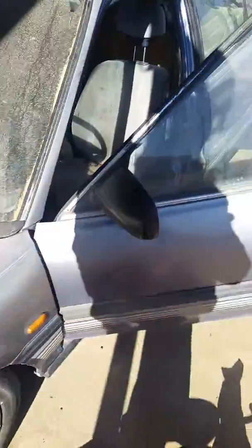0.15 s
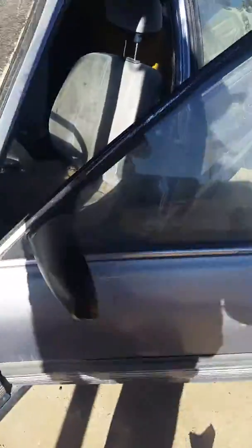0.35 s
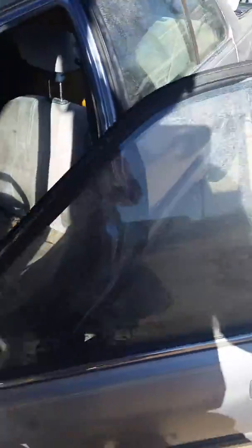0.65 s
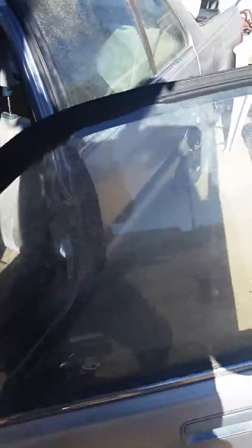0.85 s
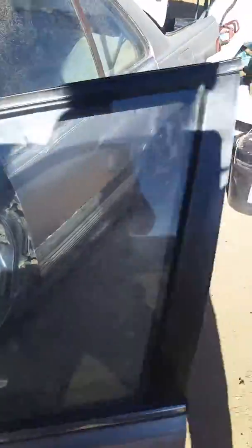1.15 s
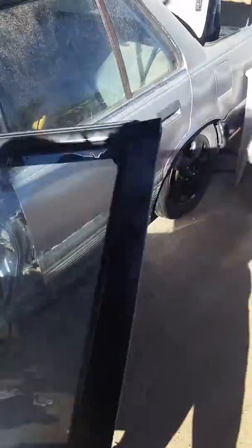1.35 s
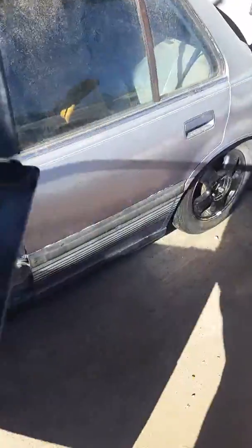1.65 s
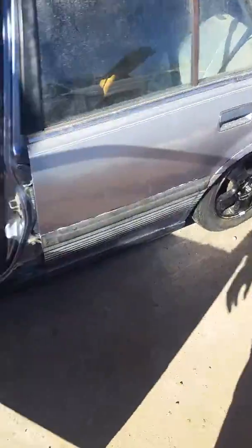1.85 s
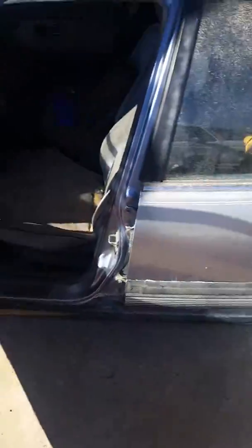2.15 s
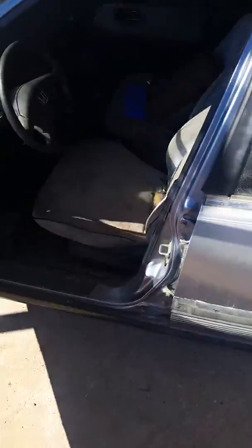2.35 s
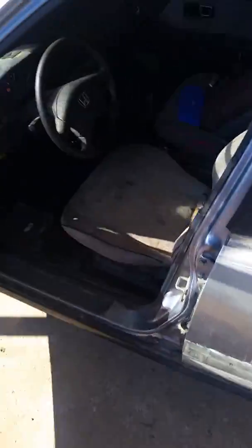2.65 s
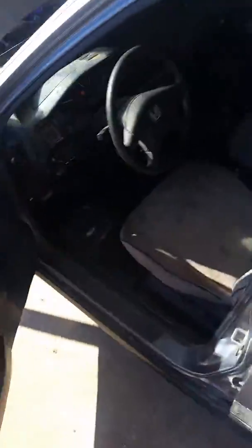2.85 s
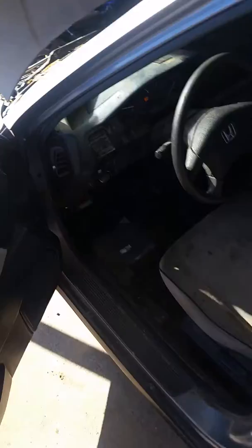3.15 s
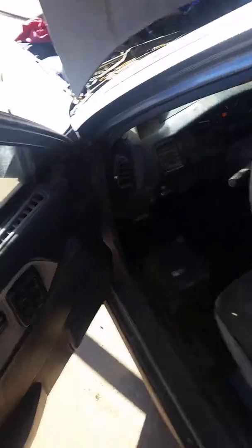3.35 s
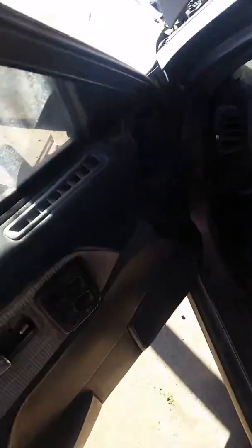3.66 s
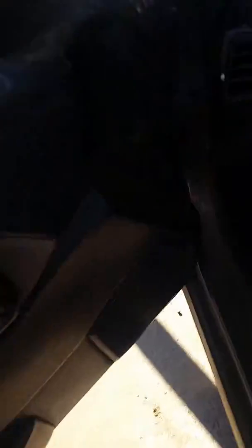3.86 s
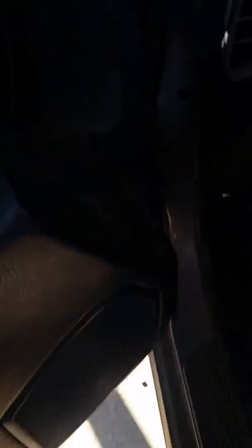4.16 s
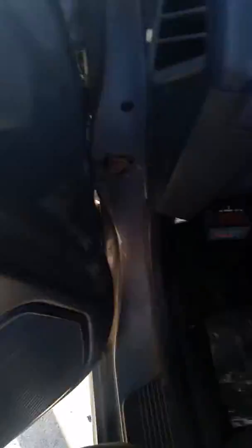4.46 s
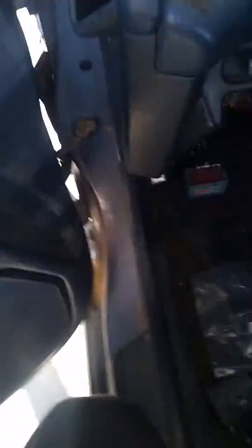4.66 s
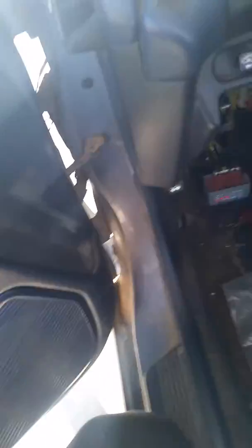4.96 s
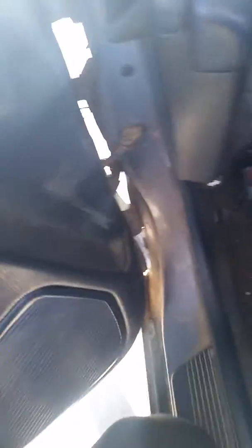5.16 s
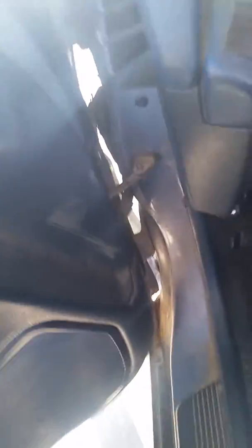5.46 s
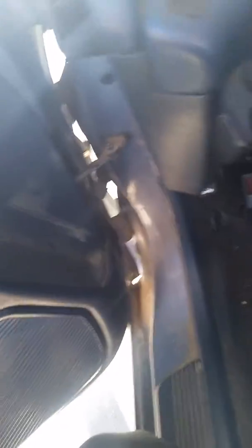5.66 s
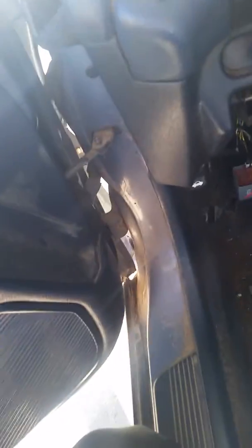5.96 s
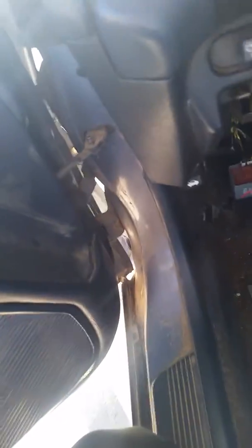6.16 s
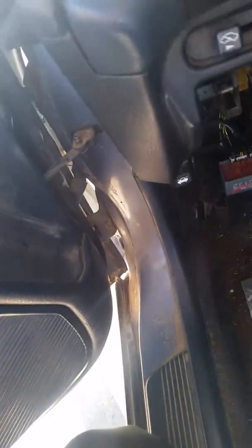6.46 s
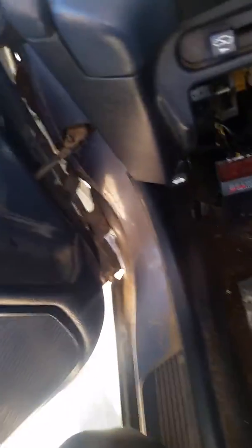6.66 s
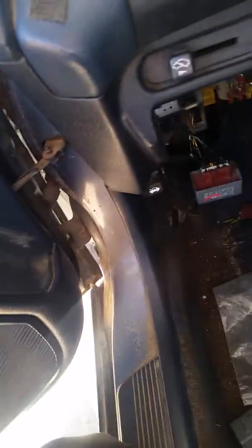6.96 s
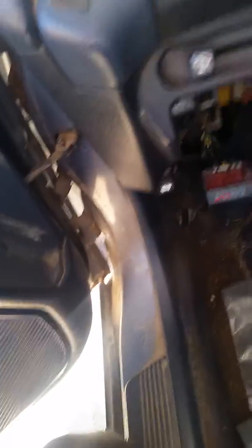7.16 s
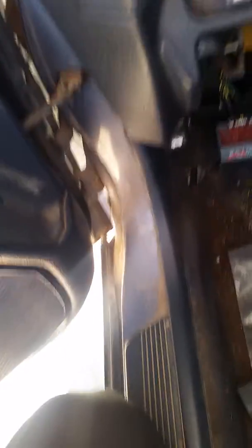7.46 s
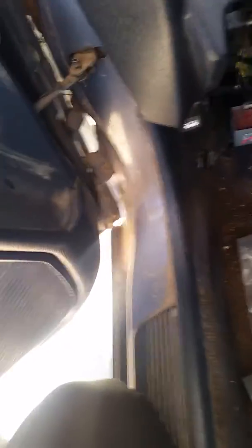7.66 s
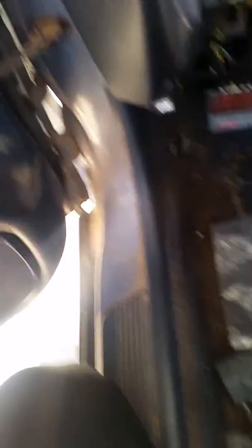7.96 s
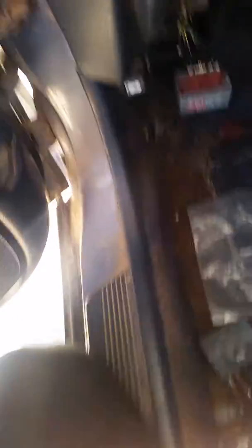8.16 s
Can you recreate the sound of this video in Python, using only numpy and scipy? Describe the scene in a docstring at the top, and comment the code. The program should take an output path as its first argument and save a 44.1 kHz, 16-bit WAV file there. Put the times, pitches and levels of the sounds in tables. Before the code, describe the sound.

A four-cylinder petrol engine idles loudly and unevenly, one cylinder weak, with bonnet open. The handheld microphone moves from front wing past the open door into the footwell, so the sound turns from bright and hissy to duller and boomier. After nearly seven seconds the ignition is cut; the engine shudders and slows, a relay clicks with a small metallic ring, and cloth brushes near the microphone.

```python
"""Car engine idling and switched off

A four-cylinder petrol engine idles with one weak cylinder, bonnet open: pulses ring its body, noise adds the hiss.
The microphone moves from the front wing, past the open door, down into the footwell.
The ignition is cut; filtered pulses and rumbling noise rock the engine as it slows.
A relay under the dashboard clicks off with a metal ring; shaped noise makes a dull knock and a sleeve's rubs."""
import sys
import numpy as np
from scipy import signal
from scipy.fft import rfft, irfft
from scipy.io import wavfile
from scipy.ndimage import uniform_filter1d, minimum_filter1d

SR = 44100
rng = np.random.default_rng(int(sys.argv[2]) if len(sys.argv) > 2 else 0)


def store_pcm(level_fs):
    """Save levels as 16-bit WAV."""
    pcm = np.round(np.clip(level_fs, -1, 1) * 32767).astype(np.int16)
    wavfile.write(sys.argv[1], SR, np.atleast_2d(pcm).T)


N = 366030
TIME = np.arange(N) / SR
BINS = np.fft.rfftfreq(N, 1 / SR)

IGNITION_OFF = 6.69  # the key is turned (s)
LAST_FIRING = 6.755  # the last charges still fire until this time (s)
IDLE_RATE = 43.5  # normal idle (firing strokes a second)

# cylinders in firing order: place_in_cycle (strokes, four to a cycle), strength_db
CYLINDERS = [(.476, 1.5), (1.463, -7.5), (2.543, -1.5), (3.486, -.3)]
# the microphone's walk: time_s, place (0 wing, 1 mirror, 2 door, 3 pillar, 4 sill, 5 footwell),
# distance_m (from the engine bay)
WALK = [(0, 0, .6), (.28, 0, .9), (.6, 1, 1.05), (.92, 1, 1.3), (1.15, 2, 1.45), (1.5, 2.2, 1.85),
        (2.3, 3, 1.6), (2.7, 3.2, 1.45), (3.15, 4, 1.42), (3.6, 4.1, 1.5), (4.15, 5, 1.6), (4.6, 5, 1.65),
        (6.6, 5, 1.35)]
# the idle hunts slowly up and down: time_s, rate (firing strokes a second)
IDLE = [(0.0, 43.75), (0.25, 44.77), (0.5, 43.0), (0.85, 43.48), (1.1, 44.86), (1.4, 45.05), (1.75, 44.72),
        (2.1, 43.24), (2.4, 42.4), (2.8, 43.1), (3.2, 44.12), (3.55, 44.04), (4.0, 43.51), (4.5, 42.56),
        (4.9, 43.31), (5.35, 43.97), (5.75, 42.43), (6.1, 42.53), (6.65, 44.09)]


def amp(db):
    """Decibels to gain."""
    return 10 ** (np.asarray(db) / 20)


def evened(x):
    """Scales a signal to rms 1."""
    return x / np.sqrt(np.mean(x ** 2) + 1e-20)


def smooth_noise(size):
    """Slow random wobble: white noise averaged over size samples, with rms 1."""
    return evened(uniform_filter1d(rng.standard_normal(N), size=size))


def bump(center_s, length_s):
    """A smooth rise to 1 and back, length_s wide where it has fallen to 1/e."""
    return np.exp(-(2 * (TIME - center_s) / length_s) ** 2)


def curve(rows, column=1):
    """One column of a time table, read at every sample."""
    rows = np.asarray(rows, float)
    return np.interp(TIME, rows[:, 0], rows[:, column])


def read(points, hz):
    """A spectrum table read along a logarithmic pitch axis."""
    f, value = np.transpose(points)
    return np.interp(np.log(hz + 1), np.log(f + 1), value)


def ring(x, hz, width):
    """A second-order resonance with gain 1 at its centre."""
    response = width * hz / (hz ** 2 - BINS ** 2 + 1j * width * BINS)
    return irfft(rfft(x) * response, N)


def ports(z, lag=0.0003):
    """Spectra to two channels: the right is shaded from the treble, the left hears lag seconds later."""
    # tilt between the channels: pitch_hz, left_minus_right_db
    lean_table = [(60, -3), (99, -3.5), (160, -3), (270, -3), (450, -1.5), (740, 0.5), (1220, 3),
                  (2010, -1), (3330, 12), (5500, 0.5), (9080, 27), (15000, 8)]
    side = amp(read(lean_table, BINS) * np.array([[.5], [-.5]]))
    side = side / np.sqrt(np.mean(side ** 2, axis=0))
    late = np.exp(-2j * np.pi * BINS * lag * np.array([[1], [0]]))
    return irfft(z * late * side, N)


def noise(points, ripple_db=3):
    """Two-channel noise, alike in the bass, with a fine uneven colour; its mid has rms 1."""
    # how alike the channels are: pitch_hz, correlation (1 is identical)
    likeness_table = [(100, 1), (300, 0.94), (550, 0), (1000, 0.07), (2000, 0), (16000, 0.057)]
    a, b = rfft(rng.standard_normal((2, N)))
    same = np.clip(read(likeness_table, BINS), -1, 1)
    ripple = np.interp(BINS, np.linspace(0, SR / 2, num=400), rng.standard_normal(400))
    # the ripple is weak in the bass and eases off again in the high treble
    ripple = ripple * BINS / (BINS + 800) / (1 + BINS / 14000)
    colour = amp(read(points, BINS) + ripple_db * ripple)
    x = ports(np.array([a, same * a + np.sqrt(1 - same ** 2) * b]) * colour)
    return x / np.std(x.mean(0))


def nearness():
    """Gain of a sound in the engine bay, falling with distance."""
    return 1 / curve(WALK, column=2)


def speed():
    """Crankshaft speed as a share of normal idle: it hunts, then coasts down, slowing fastest at first."""
    coast_s, coast_bend = 2.3, 1.5  # the coast to rest would take coast_s
    left = np.clip(1 - (TIME - LAST_FIRING) / coast_s, 1e-3, 1)
    return curve(IDLE) / IDLE_RATE * left ** coast_bend


def suction(knee=0.75, steepness=3.7):
    """Air hisses in until the engine slows to the knee (a share of idle), then the vacuum collapses."""
    return 1 / np.sqrt(1 + (knee / speed()) ** (2 * steepness))


def strokes():
    """Firing strokes turned so far; four make one engine cycle."""
    return np.cumsum(IDLE_RATE * speed()) / SR


def pulses(cylinders, spread_db, jitter):
    """One push per cylinder and cycle, each a little off in strength and in time (jitter in s)."""
    turned, out = strokes(), np.zeros(N)
    for place, db in cylinders:
        chance = rng.standard_normal((100, 2))
        # 99 s lies past the end, so strokes never reached are dropped
        at = np.interp(place + 4 * np.arange(len(chance)), turned, TIME, right=99)
        at = (at + jitter * chance[:, 0]) * SR
        keep = (at >= 0) & (at < N - 1)
        np.add.at(out, at[keep].astype(int), amp(db + spread_db * chance[keep, 1]))
    return out


def rumble(level_db=-39):
    """A low noise rumble that fades away from key-off to the end."""
    # colour: pitch_hz, level_db (per Hz)
    rumble_colour = [(12, 22), (28, -25), (45, 18), (120, -27), (400, -37), (1000, -72)]
    running = np.clip((TIME[-1] - TIME) / (TIME[-1] - IGNITION_OFF), 0, 1)
    return amp(level_db) * running * noise(rumble_colour)


def whistle(base_db=-57):
    """Air whistles thinly in the engine bay as narrow noise, clearest between wing and mirror."""
    # colour: pitch_hz, level_db (per Hz)
    whistle_colour = [(11000, -49.5), (12200, -14), (12500, 3), (12800, -3), (14000, -50.5)]
    # the swell about half a second in: center_s, length_s, rise_db (gain added to the steady whistle's 1)
    whistle_swell = (0.46, 0.42, 13.4)
    center_s, length_s, rise_db = whistle_swell
    swell = 1 + amp(rise_db) * bump(center_s, length_s)
    return amp(base_db) * swell * suction() * nearness() * noise(whistle_colour)


def knock_and_sleeve(grain=0.18, slide_at=8.1, slide_length=.25, slide_db=-54):
    """Noise bursts: a short dull knock, then cloth rubbing with a sheen of fibres; the arm slides off the plastic."""
    # a short dull knock, then brushes of cloth: center_s, length_s, dull_db, sheen_db
    burst_table = [(2.803, 0.021, -32, -65), (7.608, 0.06, -36, -61), (7.692, 0.063, -34, -57),
                   (7.76, 0.074, -45, -57), (7.84, 0.087, -37.5, -55.5), (7.93, 0.091, -40.5, -68),
                   (8.037, 0.1, -45, -65.5)]
    # colours of the dull part, the sheen and the slide: pitch_hz, level_db (per Hz)
    dull_colour = [(200, 9), (400, 2), (560, -10), (900, 0.5), (1300, -5), (2500, -24), (6000, -60)]
    sheen_colour = [(6000, -44), (7800, -13), (8800, 4), (10000, -5), (11500, -18), (16000, -26)]
    slide_colour = [(410, -46), (700, -25), (1400, -2), (1670, -4), (1800, 2), (2000, -21), (3460, -12),
                    (7000, -56), (9100, -86), (15400, -120)]
    dull, sheen = np.zeros(N), np.zeros(N)
    for center_s, length_s, dull_db, sheen_db in burst_table:
        burst = bump(center_s, length_s)
        dull += amp(dull_db) * burst
        sheen += amp(sheen_db) * burst
    slide = amp(slide_db) * bump(slide_at, slide_length)
    catch = evened(np.exp(grain * smooth_noise(250)))
    return (noise(dull_colour) * dull + noise(sheen_colour) * sheen + noise(slide_colour) * slide) * catch


def clicks(snap_db=-3, ring_db=-10, cabin_db=-27, cabin_t60=0.2):
    """Each click is a short noise snap with a ring of decaying sines and a brief cabin tail."""
    # the relay's armature letting go and bouncing, and small ticks, one (at 3.3 s) from a tappet:
    # start_s, level_db (relative), t60_s (time to fade 60 dB), treble_db (boost)
    click_table = [(3.299, -32, 0.028, -10), (4.439, -22.5, 0.056, -12), (7.4681, -32.5, 0.026, 10),
                   (7.4745, -23, 0.016, -7), (7.4771, -18, 0.041, 5.5), (7.485, -22, 0.017, -2),
                   (7.4907, -29, 0.05, -19), (7.9936, -47, 0.03, 0)]
    # colour of the snap: pitch_hz, level_db (per Hz)
    click_colour = [(260, -37), (450, -12), (572, 7), (818, -11), (1020, -15), (1470, 4.5), (1830, -2.5),
                    (2510, -6), (3810, -7), (4490, 0.5), (6730, -30.5), (8670, 6.5), (11900, -12),
                    (14200, -6), (16000, -26)]
    # ring of the relay and its bracket: pitch_hz, level_db (relative), t60_s
    relay_modes = [(570, 0.5, .06), (803, -4.5, 0.074), (1460, -14, .05), (1896, 1, 0.077),
                   (3400, -8, 0.079), (4650, -21, 0.11), (8400, -13, 0.053), (9400, -5, 0.046)]
    snap, out = noise(click_colour), np.zeros((2, N))
    treble = irfft(rfft(snap) * BINS ** 4 / (BINS ** 4 + 6000. ** 4), N)  # mostly above 6 kHz
    t = np.arange(SR // 4) / SR
    metal = sum(amp(db - 60 * t / t60) * np.sin(2 * np.pi * hz * t) for hz, db, t60 in relay_modes)
    rings = np.zeros(N)
    for start_s, db, t60, treble_db in click_table:
        span = slice(round(start_s * SR), round(start_s * SR) + len(t))
        fade = amp(-60 * t / t60) + amp(cabin_db - 60 * t / cabin_t60)
        tinted = snap[:, span] + (amp(treble_db) - 1) * treble[:, span]
        out[:, span] += amp(db + snap_db) * fade * tinted
        rings[span] += amp(db + ring_db) * metal
    return out + ports(rfft(rings) * np.ones((2, 1)))


def valves(level_db=-36.0, shade_db_per_place=-1.0, unloaded_db=-3.0, tick_db=-4, tick_db_per_place=1.63,
           tick_unloaded_db=-7, rise=0.26, grain=0.082):
    """The cylinder head hisses; loose tappets tick once a cycle, clearer in the cabin, softer without spark."""
    # loose valve tappets: place_in_cycle (strokes), level_db (relative), decay (strokes)
    tappet_table = [(.26, 5, 0.35), (1.05, -18, 0.51), (2.23, 7, 0.5), (3.1, 0.5, 0.48)]
    # colours of the hiss and the ticks: pitch_hz, level_db (per Hz)
    hiss_colour = [(3000, -19), (4400, -7), (5400, -17), (6400, -18.5), (7600, -11.5), (8400, -2),
                   (9000, 1), (10500, -6.5), (13000, -8), (16000, -10)]
    tick_colour = [(3000, -20.5), (4400, -4.5), (5400, -16.5), (6400, -20.5), (7600, -6.5), (9000, 3),
                   (10500, -2.5), (13000, -2.5), (16000, -1)]
    turned, power = strokes(), np.zeros(N)
    inside, off = curve(WALK), TIME > IGNITION_OFF
    reach = amp(tick_db + tick_db_per_place * inside + tick_unloaded_db * off) * speed()
    for place, db, decay in tappet_table:
        cycle, since = np.divmod(turned - place + 4, 4)  # since: strokes after the latest tick
        strength = amp(db + rng.standard_normal(100))[cycle.astype(int)]
        shape = np.minimum(since / rise, 1) * np.exp(-since / decay)
        power += (2 * reach * strength * shape) ** 2
    grit = np.exp(grain * smooth_noise(70))
    level = amp(level_db + shade_db_per_place * inside + unloaded_db * off) * suction() * nearness()
    ticks = noise(tick_colour, ripple_db=-7.0) * np.sqrt(power)
    return (noise(hiss_colour) + ticks) * grit * level


def clatter(level_db=-35.5, speed_power=1.0, unloaded_db=-3, throb=0.013, grain=0.18):
    """Belts and valve gear rattle as nearly steady midrange noise, fading with the speed."""
    # colour: pitch_hz, level_db (per Hz)
    clatter_colour = [(200, -0.5), (450, 8), (700, 3.5), (1000, -0.5), (1350, -1.5), (1650, -5), (1950, -4),
                      (2500, -9), (3200, -12), (4300, -12.5), (5500, -36), (7000, -43), (10000, -59)]
    ripple = 1 + throb * np.cos(2 * np.pi * (strokes() - .55))  # about 0.1 dB, too little to hear
    grit = np.exp(grain * smooth_noise(120))
    level = amp(level_db + unloaded_db * (TIME > LAST_FIRING)) * speed() ** speed_power
    return noise(clatter_colour) * ripple * grit * level * nearness()


def rundown(level_db=-17.5, speed_power=1.22, heave_db=2, heave_place=0.26, rock_db=-5, rock_hz=78, rock_width=22):
    """Without spark, slowing compression strokes rock the engine; the loose body rumbles and heaves."""
    # colour of the rumbling body: pitch_hz, level_db (per Hz)
    shudder_colour = [(18, -24), (30, -3), (42, 5.5), (56, -12), (78, 2), (105, -2), (150, -10),
                      (250, -16.5), (340, -22.5), (450, -40), (900, -93)]
    # the coasting engine lurches on its mounts: center_s, length_s, rise_db
    lurch_table = [(6.826, 0.082, 3.5), (6.917, 0.13, 3), (7.263, .13, 2.5), (7.42, 0.052, 2),
                   (7.623, .09, 3), (7.927, 0.093, 6.5), (8.055, 0.14, 5)]
    off = np.clip((TIME - IGNITION_OFF) / 0.098, 0, 1)
    push = pulses([(place, 0) for place, db in CYLINDERS], spread_db=2.5, jitter=0.0045)
    rock = ports(rfft(evened(ring(ring(push, rock_hz, rock_width), rock_hz, rock_hz))))
    shake = amp(rock_db) * rock + noise(shudder_colour)
    # level out the shake, so that the speed, heaves and lurches set its loudness
    shake = shake / np.sqrt(abs(uniform_filter1d(shake.mean(0) ** 2, size=3500)) + 1e-12)
    heave = np.cos(2 * np.pi * (strokes() - heave_place))
    lurch_db = sum(db * bump(center_s, length_s) for center_s, length_s, db in lurch_table)
    return shake * off * speed() ** speed_power * amp(level_db + heave_db * heave + lurch_db)


def firing(trim_db=0, effort_db=1.5, turbulent_hz=600, puff_decay=0.057, low_hz=30, soft_hz=1150):
    """Combustion pulses ring the low resonances; turbulent gas behind each feeds the high ones.
    Each extra stroke a second makes the boom louder by effort_db."""
    # resonances of exhaust, panels and cabin: pitch_hz, width_hz, then the relative level_db heard at
    # wing, mirror, door, pillar, sill and footwell
    body_modes = [(36.4, 13, -17, -14, -9, -8.5, -9, -4.5), (61.8, 132, -32.5, -28.5, -22, -12, -20, -9),
                  (101.2, 69.3, -21, -14, -13, -10.5, -16, -6.5),
                  (125.46, 19.5, -4, -4, -6, -14.5, -21, -14.5),
                  (129.3, 20.2, -5, -4.5, -6.5, -7, -8.5, -33.5),
                  (178.5, 30.6, -22.5, -15, -14, -19, -13.5, -19.5),
                  (226.2, 23.7, -18, -16, -14, -20.5, -15.5, -18),
                  (248.5, 7.1, -14.5, -13.5, -26.5, -20, -17.5, -14.5),
                  (268, 9.9, -18.5, -20, -21, -23, -28, -17.5),
                  (312.5, 18.5, -22.5, -18.5, -21, -28, -26, -19),
                  (339.8, 11.6, -19, -13, -22.5, -23, -20.5, -19),
                  (404.3, 18, -32, -34, -24.5, -31.5, -28, -34.5),
                  (438.8, 11.5, -33, -30, -29.5, -26, -28.5, -26.5),
                  (480.6, 10.9, -25.5, -27.5, -25, -26.5, -27, -29.5),
                  (542, 10.7, -32, -34.5, -32, -30, -28, -32), (654, 133, -41, -50, -40, -42.5, -37, -58.5),
                  (749, 80, -54, -44, -45, -50, -45, -42)]
    mounts_hz = 105  # modes below this are shaken through the engine mounts
    push = pulses(CYLINDERS, spread_db=0.97, jitter=0.00008) * (TIME < LAST_FIRING)
    puffs = signal.lfilter([1], [1, -np.exp(-1 / (puff_decay * SR))], push)
    gas = np.std(push) * evened(puffs * rng.standard_normal(N))
    drives = np.array([push, gas]) * SR / (np.sqrt(2) * curve(IDLE))
    band = signal.butter(2, [low_hz, soft_hz], "band", fs=SR, output="sos")
    push, gas = signal.sosfilt(band, drives)
    place, boom = curve(WALK), np.zeros(N)
    for k, (hz, width, *place_db) in enumerate(body_modes):
        rough = 1 / (1 + (turbulent_hz / hz) ** 4)  # share of gas in the drive
        # a shake through the mounts comes one stroke before the exhaust pulse
        kick = np.interp(TIME + (hz < mounts_hz) / IDLE_RATE, TIME, push)
        mode = ring(np.sqrt(1 - rough) * kick + np.sqrt(rough) * gas, hz, width)
        level = amp(np.interp(place, np.arange(len(place_db)), place_db))
        # neighbouring modes swing in opposite senses, so each pulse arrives late and spread out
        boom -= (-1) ** k * level * mode
    effort = amp(trim_db + effort_db * (curve(IDLE) - IDLE_RATE))
    return ports(rfft(boom * nearness() * effort))


def scene():
    """The small background sounds, the engine's mechanical noise, its run-down and its boom."""
    background = rumble() + whistle() + knock_and_sleeve() + clicks()
    return background + valves() + clatter() + rundown() + firing()


def record(dry):
    """A limiter holds peaks under a ceiling, then a filter removes the highest treble."""
    ceiling_db, edge_hz = -1.0, 15900
    gain = np.minimum(amp(ceiling_db) / (abs(dry).max(0) + 1e-9), 1)
    held = dry * uniform_filter1d(minimum_filter1d(gain, size=300), size=300)
    lowpass = signal.firwin(511, edge_hz, window=("kaiser", 9), fs=SR)
    return signal.oaconvolve(held, lowpass[None], "same")


dry = scene()
out = record(dry)
store_pcm(out)
```